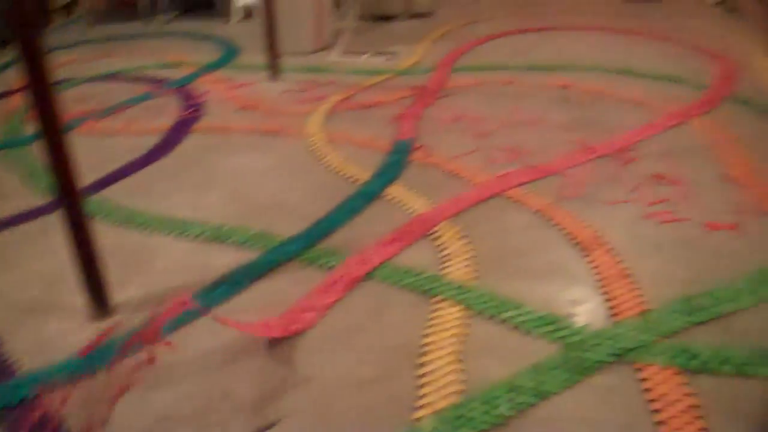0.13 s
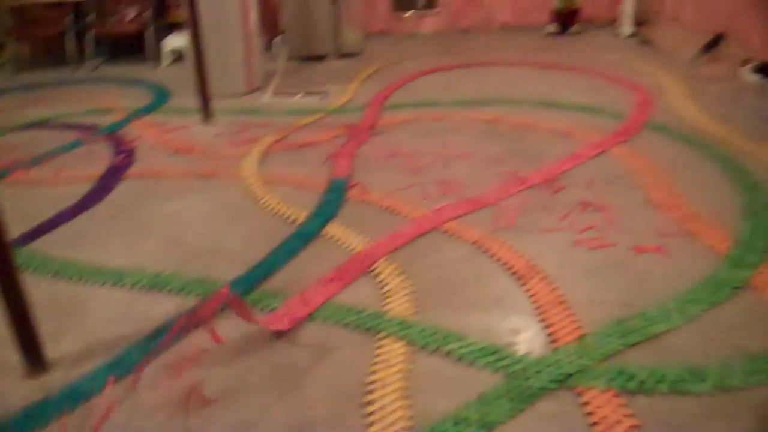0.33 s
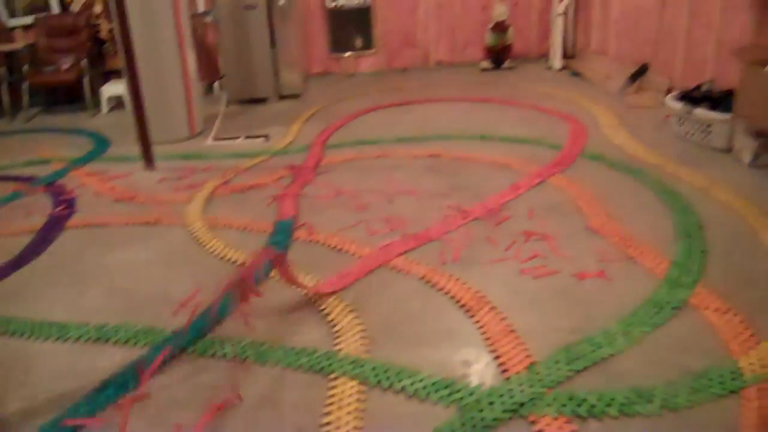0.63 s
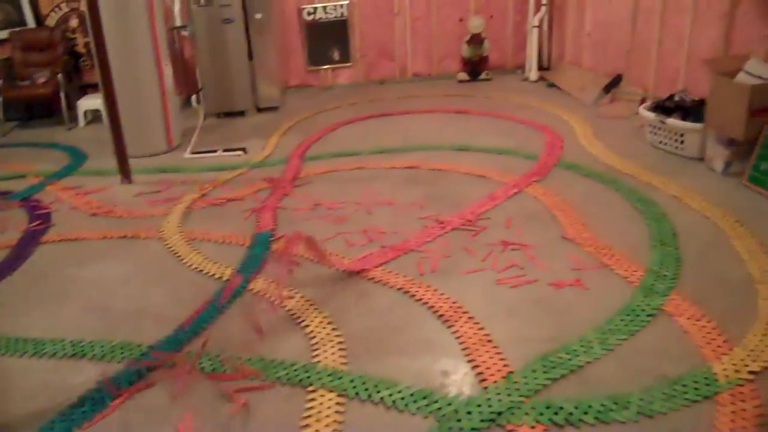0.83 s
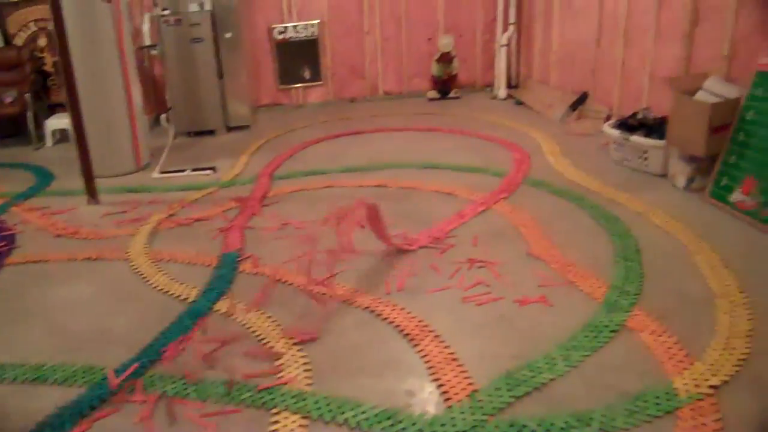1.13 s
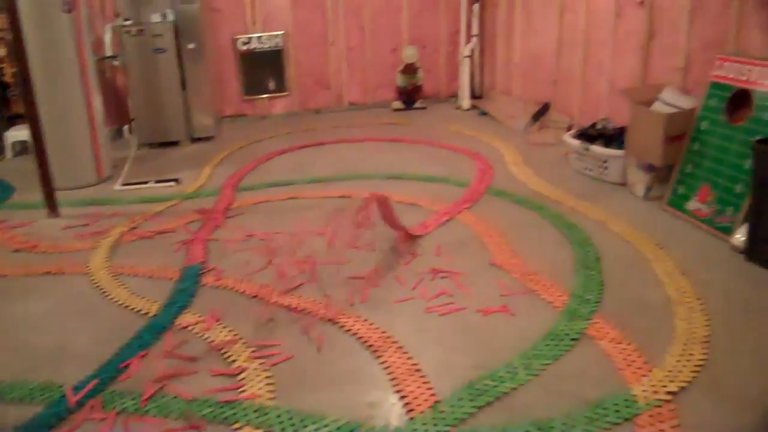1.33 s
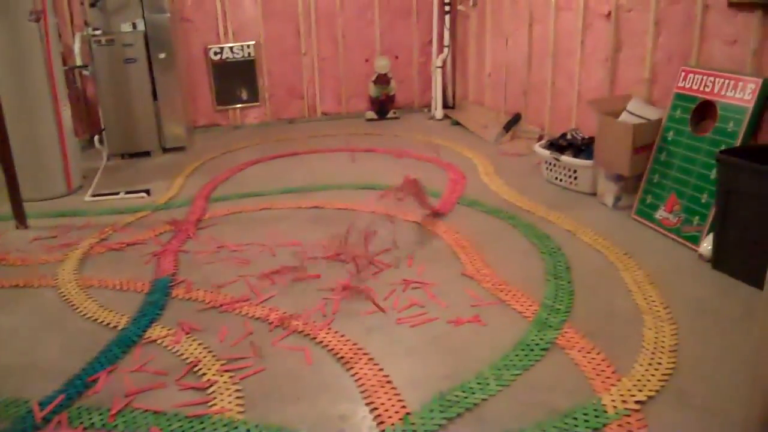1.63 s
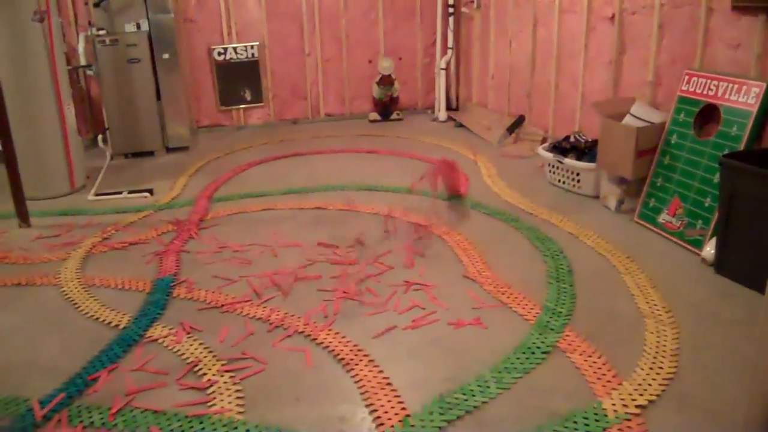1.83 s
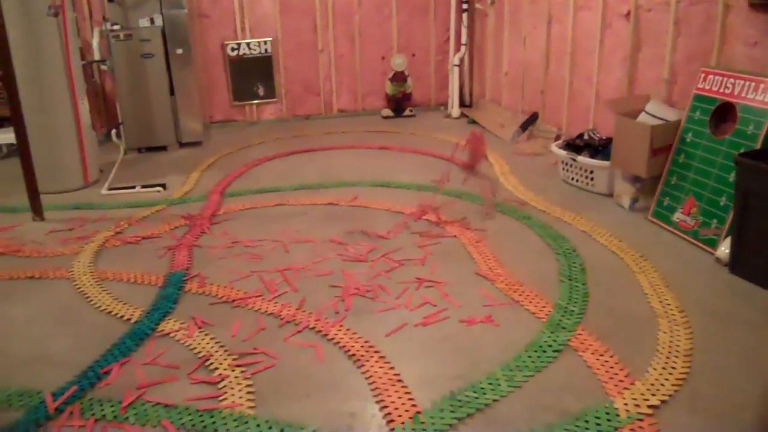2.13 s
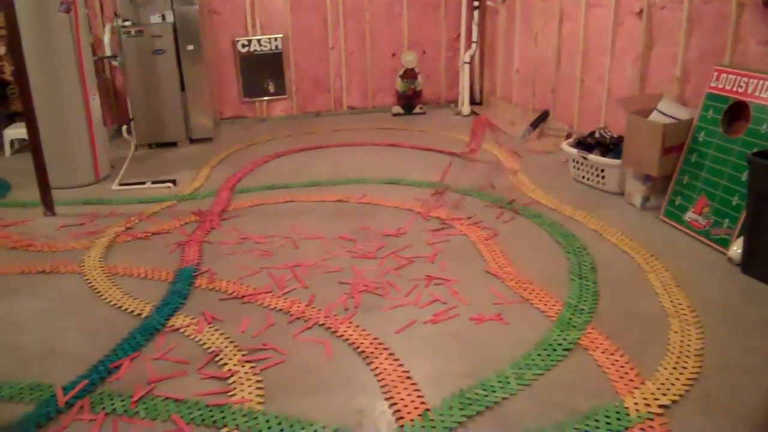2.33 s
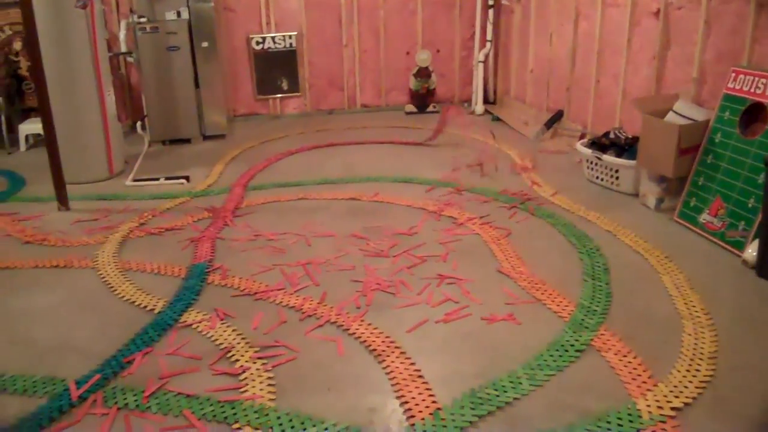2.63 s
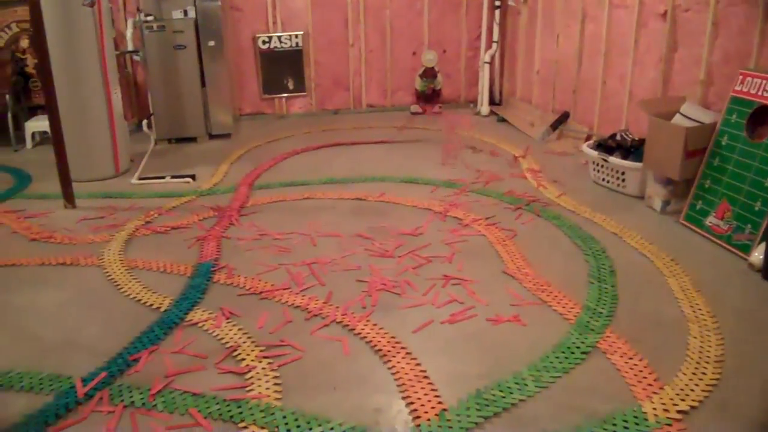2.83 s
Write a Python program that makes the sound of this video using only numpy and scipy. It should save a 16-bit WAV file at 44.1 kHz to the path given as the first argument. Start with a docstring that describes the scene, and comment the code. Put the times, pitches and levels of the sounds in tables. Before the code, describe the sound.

Flat wooden sticks clatter nonstop onto a concrete basement floor as a woven chain springs apart. Sharper nearby cracks and brief pings stand out, and the clatter blurs slightly as it moves away, over a faint hum.

```python
"""A basement with a concrete floor: a woven chain of flat wooden sticks springs apart and runs away.
Hundreds of sticks a second snap free, land and bounce, each with a crack and a short ring.
A few near ones stand out, some ring on in flight, and dull pops sound on the left.
The room blurs the clatter more as it recedes. An appliance hums faintly over a low rumble.
Each of two small microphones has its own treble peak."""
import sys
import numpy as np
from scipy import signal
from scipy.fft import rfft, irfft, next_fast_len
from scipy.io import wavfile

SR = 44100
rng = np.random.default_rng(int(sys.argv[2]) if len(sys.argv) > 2 else 0)


def digitize_waveform(pressure):
    """Quantize a signal to 16-bit integers and store it at the path in sys.argv[1].

    Rows of a 2-D input are taken as channels; values are limited to [-1, 1].
    """
    field = np.atleast_2d(pressure).T
    bounded = np.clip(field, -1, 1)
    quanta = np.round(bounded * 32767).astype(np.int16)
    wavfile.write(sys.argv[1], SR, quanta)


N = 130977

# rumble spectrum (frequency [Hz], gain [dB])
RUMBLE_SPECTRUM = [(25, -19), (60, -10), (120, 0.5), (200, 2), (400, -8), (1000, -7), (8000, -31)]
# appliance hum (frequency [Hz], rms level [dB])
HUM_LINES = [(120, -56.5), (222, -55), (259, -67)]
# room decay (frequency [Hz], T60 [s])
ROOM_DECAY = [(200, 0.48), (4000, 0.34), (8000, 0.23), (13000, 0.14)]
# dull pops (time [s], left peak level [dB])
DULL_POPS = [(.695, -15), (2.3785, -11), (2.3794, -8), (2.3816, -12.5), (2.589, -17)]
# sticks ringing in flight (time [s], frequency [Hz], level [dB])
FLIGHT_PINGS = [(0.539, 4030, -16.5), (.562, 4230, -15.5), (.962, 4260, -17.5), (0.999, 5460, -16.5),
                (1.104, 4177, -14.5), (1.320, 5320, -19), (1.355, 4100, -17), (1.709, 4300, -23),
                (2.476, 4050, -17), (2.530, 4060, -22), (2.590, 4120, -23), (2.732, 4050, -15)]
# stick radiation (frequency [Hz], gain [dB])
WOOD_SPECTRUM = [(30, -40), (90, -42), (200, -15), (300, -19.5), (380, -15.5), (530, -25.5), (650, -20),
                 (850, -19), (1200, -21), (2000, -14), (3000, -8), (4100, -0.97), (5000, -1), (7000, -2.5),
                 (10000, -8.5), (14000, -16.5)]
# hard landings (time [s], relative level [dB])
HARD_LANDINGS = [(.004, 0), (.012, -4), (0.066, -6), (0.09, 0), (.158, -1.5), (.308, 0), (.320, 1),
                 (.382, -3), (.451, -9), (.459, -3), (.617, -1), (0.648, -3.5), (0.6713, 4.5), (0.6741, 0),
                 (.687, 1), (.826, -4), (.905, 1.5), (.944, -42), (0.964, -20), (1.071, 2), (1.088, 0.5),
                 (1.104, -1.5), (1.225, -4), (1.321, -6.5), (1.434, 2), (1.541, -11), (1.587, -3),
                 (1.606, -8), (1.707, -6), (1.811, -5), (1.993, -8), (2.088, 0), (2.378, 3), (2.381, -4),
                 (2.657, -1), (2.664, -0.5), (2.793, -7), (2.803, -6), (2.894, 3)]
# clatter envelope (time [s], relative level [dB])
CLATTER_ENVELOPE = [(0.01, -19), (0.04, -25), (0.17, -21.5), (0.29, -25.5), (0.33, -19.5), (0.36, -24.5),
                    (0.46, -18.5), (0.5, -22), (0.54, -18.5), (0.66, -20.5), (0.67, -18.5), (0.76, -20),
                    (1.06, -21), (1.09, -18.5), (1.16, -20.5), (1.46, -19), (1.49, -22.5), (1.6, -15.5),
                    (1.7, -21), (1.71, -16.5), (1.81, -22), (1.81, -17), (1.91, -21.5), (1.99, -16),
                    (2.01, -19.5), (2.28, -19.5), (2.36, -17.5), (2.47, -23.5), (2.5, -17.5), (2.65, -20.5),
                    (2.66, -16.5), (2.69, -20), (2.8, -17), (2.88, -19.5), (2.89, -16.5), (2.96, -22)]
# low shelf of the clatter (time [s], gain [dB])
BODY_ENVELOPE = [(0, -8), (.3, -5), (.55, 0), (1.2, 0), (1.8, -5.5), (2.3, -1.5), (2.65, 2), (2.95, -1)]
# left microphone (frequency [Hz], gain [dB])
LEFT_RESPONSE = [(4000, -.5), (6000, 1.5), (6700, 4.5), (7500, 11.5), (8200, 8), (9000, 3), (10500, 1),
                 (14000, 4)]
# right microphone (frequency [Hz], gain [dB])
RIGHT_RESPONSE = [(4000, 1.5), (5000, 3.5), (6050, 9.5), (6700, 3.5), (7500, -1), (8200, -1.5), (10000, -9),
                  (12000, -14), (14000, -32.5)]

RUMBLE_DB, RUMBLE_SIDE_DB = -53, -5
HUM_WAVER, HUM_START_DB, HUM_RISE_S = .28, -5.5, .5
ROOM_SEND_DB, ROOM_DELAY_S = (-.5, 2.1), .003  # send: start, end
ROOM_COHERENCE, COHERENCE_HZ = .67, 3070
POP_CORNER_HZ, POP_RIGHT_DB = 1700, -22
PING_T60_S = .074
HIT_SAMPLES, FIRST_MODE_HZ, RING_T60_CYCLES = 1536, (199.4, 382), 100
MODE_TILT, MODE_SPREAD_DB = .72, 3
LEFT_LAG_S, LAG_SPREAD_S = 30e-6, 28e-6
HARD_DB, HARD_FADE_DB, HARD_HIGHPASS_HZ = 11, -2, 1090
STICKS_PER_S, STRENGTH_DB, CLATTER_TRIM_DB = 360, (-4.5, 3.5), -4
FIRST_FLIGHT_S, RESTITUTION = (.0035, .07), .68
BODY_HZ, TREBLE_HZ, TREBLE_FADE_DB = 696, 8550, -3.5
PAN_DB = (.24, 2)  # left over right: start, end
CUTOFF_HZ = 14300


def amp(db):
    """Decibels to gain."""
    return 10 ** (np.asarray(db) / 20)


def unit(x):
    """Scale to energy 1."""
    return x / np.sqrt(np.sum(x ** 2, axis=-1, keepdims=True) + 1e-20)


def band(x, hz, kind):
    """First-order high-pass or low-pass."""
    return signal.sosfilt(signal.butter(1, hz, kind, fs=SR, output="sos"), x)


def colour(x, points):
    """Minimum-phase filter from (frequency [Hz], gain [dB])."""
    size = next_fast_len(N + SR // 10) * 2
    hz, db = np.transpose(points)
    bin_hz = np.arange(size // 2 + 1) * SR / size
    log_gain = np.log(amp(np.interp(np.log(bin_hz + 1), np.log(hz), db)))
    cepstrum = irfft(log_gain)[:size // 2]
    cepstrum[1:] *= 2
    return irfft(rfft(x, size) * np.exp(rfft(cepstrum, size)))[..., :N]


def add(out, at_s, sound):
    """Mix a sound in at a time."""
    start = int(at_s * SR)
    if 0 <= start < N:
        out[:, start:start + sound.shape[-1]] += sound[..., :N - start]


def rumble():
    """Steady low noise, partly shared by both channels."""
    mid, side = unit(colour(rng.standard_normal((2, N)), RUMBLE_SPECTRUM)) * np.sqrt(N) * amp(RUMBLE_DB)
    return mid + amp(RUMBLE_SIDE_DB) * side * [[1], [-1]]


def appliance_hum():
    """Wavering tones, fainter at first."""
    out, t = np.zeros(N), np.arange(N) / SR
    rise_db = np.interp(t, [0, HUM_RISE_S], [HUM_START_DB, 0])
    for hz, db in HUM_LINES:
        waver = 1 + HUM_WAVER * np.interp(t, np.linspace(0, t[-1], 20), rng.standard_normal(20))
        out += np.sqrt(2) * amp(db + rise_db) * waver * np.sin(2 * np.pi * (hz * t + rng.random()))
    return out


def basement(x, bands=20):
    """Scattered landings give diffuse echoes: noise bands follow the room's stored, decaying energy."""
    edges_hz = np.geomspace(100, 16000, bands + 1)
    white, wet = rng.standard_normal((2, 2, N)), np.zeros((2, N))
    sent = x.mean(axis=0) * amp(np.linspace(*ROOM_SEND_DB, N))
    for k, (low, high) in enumerate(zip(edges_hz, edges_hz[1:])):
        sos = signal.butter(2, [low, high], "band", fs=SR, output="sos")
        centre_hz = np.sqrt(low * high)
        t60_s = np.interp(centre_hz, *np.transpose(ROOM_DECAY))
        retained = 1e-6 ** (1 / (SR * t60_s))
        energy = signal.lfilter([1 - retained], [1, -retained], signal.sosfilt(sos, sent) ** 2)
        mid, side = unit(signal.sosfilt(sos, white[k % 2])) * np.sqrt(N / 2)
        coherence = ROOM_COHERENCE / (1 + (centre_hz / COHERENCE_HZ) ** 4)
        diffuse = mid * np.sqrt(1 + coherence) + side * np.sqrt(1 - coherence) * [[1], [-1]]
        add(wet, ROOM_DELAY_S, np.sqrt(energy) * diffuse)
    return wet


def pops():
    """Dull unipolar pulses, mostly left."""
    out, t = np.zeros((2, N)), np.arange(HIT_SAMPLES) / SR
    phase = 2 * np.pi * POP_CORNER_HZ * t
    for at_s, db in DULL_POPS:
        add(out, at_s, amp(db) * phase * np.exp(1 - phase))
    return out * amp([[0], [POP_RIGHT_DB]])


def pings():
    """A stick flying free rings on in one mode."""
    out, t = np.zeros((2, N)), np.arange(SR // 10) / SR
    for at_s, hz, db in FLIGHT_PINGS:
        add(out, at_s, amp(db - 60 * t / PING_T60_S) * np.sin(2 * np.pi * hz * t))
    return out


def stick(crack_decay_s, crack_db, count=1):
    """Stereo hits of one stick: contact noise plus free-bar modes, mixed anew by each contact point."""
    t = np.arange(HIT_SAMPLES) / SR
    mode_hz = rng.uniform(*FIRST_MODE_HZ) * (np.arange(3, 25, 2) / 3) ** 2
    weights = rng.standard_normal((count, len(mode_hz))) * mode_hz ** MODE_TILT * (mode_hz < CUTOFF_HZ)
    weights *= amp(MODE_SPREAD_DB * rng.standard_normal(weights.shape))
    cycles = mode_hz[:, None] * t
    modes = np.sin(2 * np.pi * cycles) * amp(-60 * cycles / RING_T60_CYCLES)
    ring = weights @ modes * (1 - t / t[-1])
    crack = rng.standard_normal((count, HIT_SAMPLES)) * np.exp(-t / crack_decay_s)
    hits = unit(unit(ring) + amp(crack_db) * unit(crack))
    lag = round((LEFT_LAG_S + rng.normal() * LAG_SPREAD_S) * SR)
    left, right = np.roll(hits, max(lag, 0), axis=1), np.roll(hits, max(-lag, 0), axis=1)
    return np.stack([left, right], axis=1)


def hard_hits():
    """Near sticks land with more crack than ring, fading as the chain runs off."""
    out = np.zeros((2, N))
    for at_s, db in HARD_LANDINGS:
        gain = amp(db + HARD_DB + HARD_FADE_DB * at_s * SR / N)
        add(out, at_s, gain * stick(crack_decay_s=.0011, crack_db=1)[0])
    return band(colour(out, WOOD_SPECTRUM), HARD_HIGHPASS_HZ, "high")


def clatter():
    """Sticks land in a steady stream; each bounce is weaker and shorter than the last."""
    out, t = np.zeros((2, N)), np.arange(N) / SR
    for due_s in np.arange(-FIRST_FLIGHT_S[1], N / SR, 1 / STICKS_PER_S):
        at_s = due_s + rng.random() / STICKS_PER_S
        strength = amp(rng.uniform(*STRENGTH_DB))
        flight_s = rng.uniform(*FIRST_FLIGHT_S)
        for bounce, hit in enumerate(stick(crack_decay_s=.00086, crack_db=-3, count=4)):
            add(out, at_s, hit * strength * RESTITUTION ** bounce)
            at_s += flight_s * RESTITUTION ** bounce
    level_db = np.interp(t, *np.transpose(CLATTER_ENVELOPE))
    out = unit(colour(out, WOOD_SPECTRUM)) * np.sqrt(N) * amp(level_db + CLATTER_TRIM_DB)
    # harder bursts are brighter; distance dulls
    treble = amp(level_db - level_db.mean() + TREBLE_FADE_DB * t / t[-1])
    body = amp(np.interp(t, *np.transpose(BODY_ENVELOPE)))
    return out + (treble - 1) * band(out, TREBLE_HZ, "high") + (body - 1) * band(out, BODY_HZ, "low")


def scene():
    """The clatter recedes into the room and drifts slightly left."""
    background = rumble() + appliance_hum()
    sticks = hard_hits() + clatter()
    pan = amp(np.linspace(*PAN_DB, N) * [[.5], [-.5]])
    return background + pops() + (sticks + basement(sticks) + pings()) * pan


def record(dry):
    """Microphone colour, clipping at full scale, steep low-pass."""
    heard = np.array([colour(dry[0], LEFT_RESPONSE), colour(dry[1], RIGHT_RESPONSE)])
    lowpass = signal.ellip(12, .2, 70, CUTOFF_HZ, fs=SR, output="sos")
    return signal.sosfilt(lowpass, np.clip(heard, -1, 1))


dry = scene()
out = record(dry)
digitize_waveform(out)
```